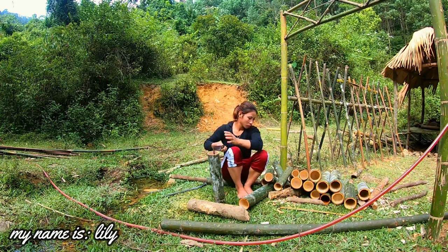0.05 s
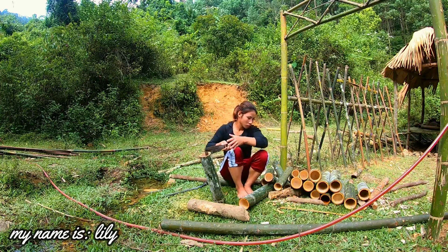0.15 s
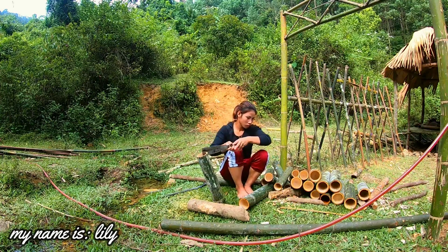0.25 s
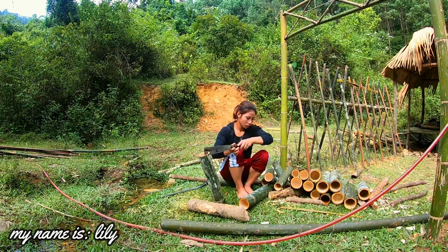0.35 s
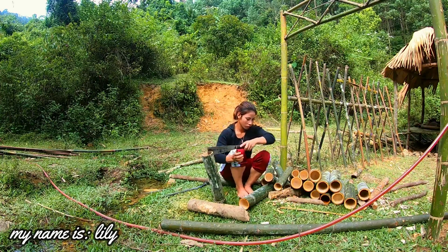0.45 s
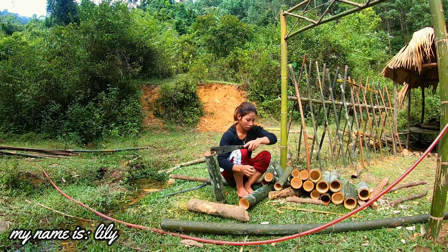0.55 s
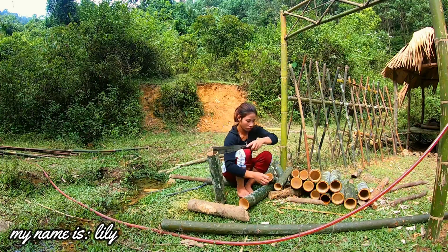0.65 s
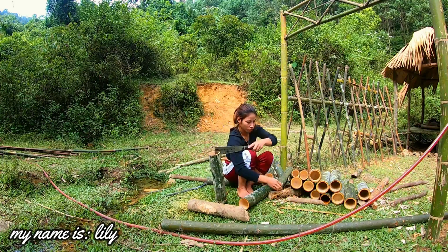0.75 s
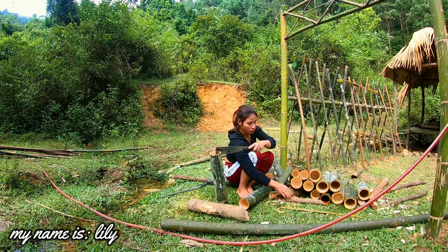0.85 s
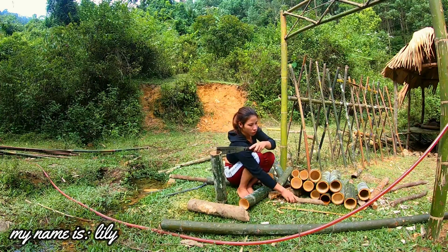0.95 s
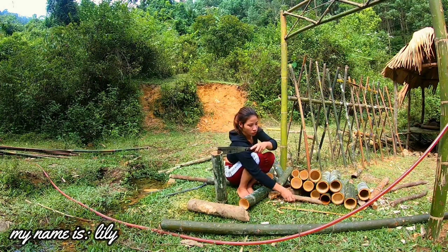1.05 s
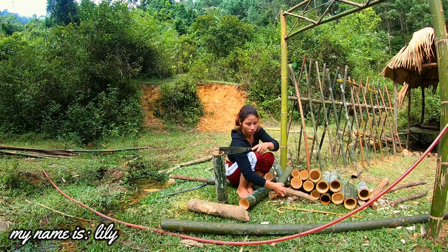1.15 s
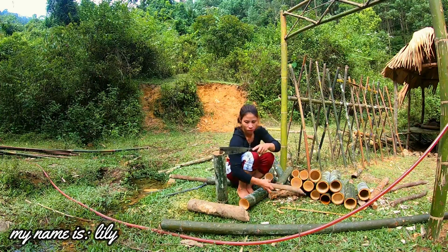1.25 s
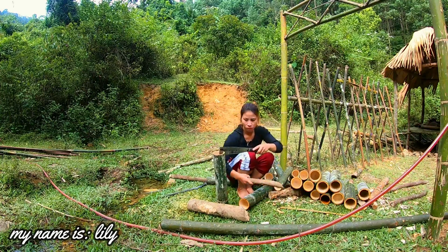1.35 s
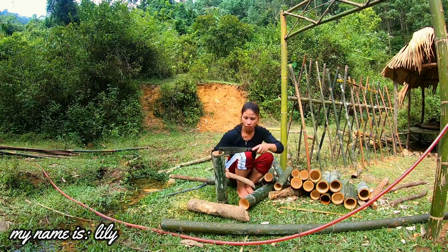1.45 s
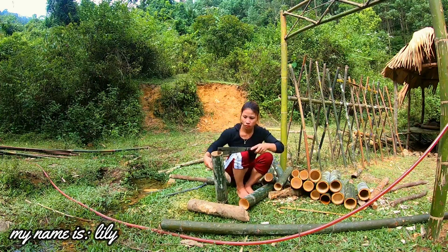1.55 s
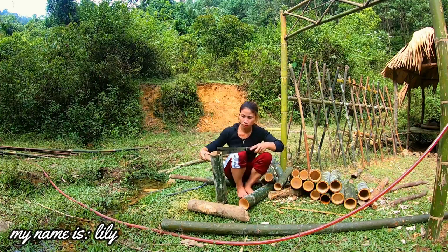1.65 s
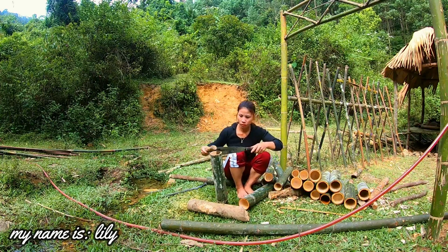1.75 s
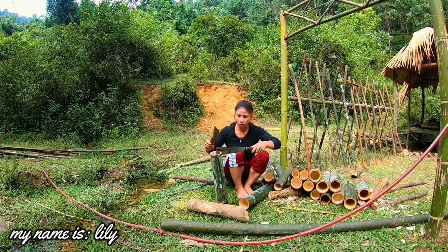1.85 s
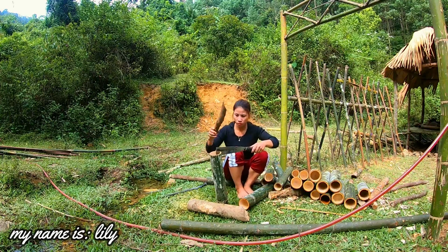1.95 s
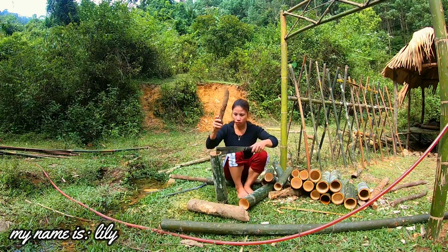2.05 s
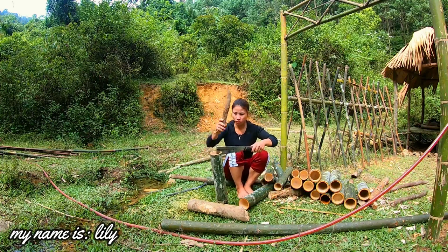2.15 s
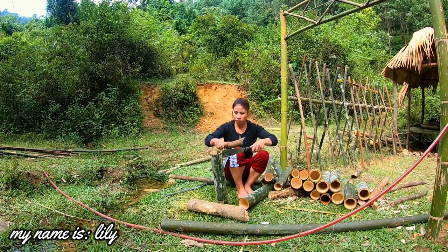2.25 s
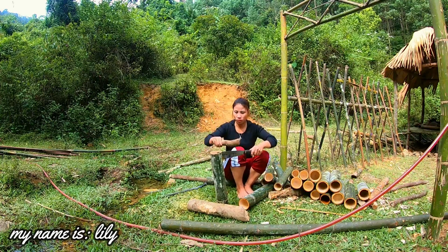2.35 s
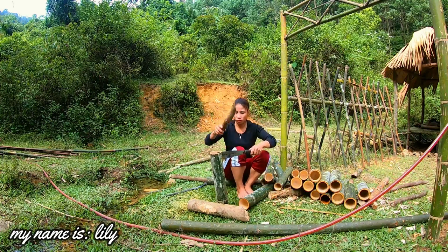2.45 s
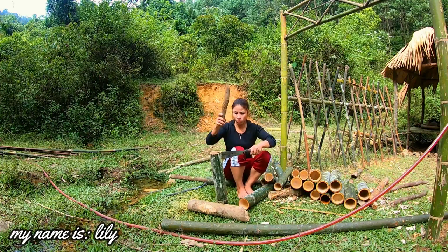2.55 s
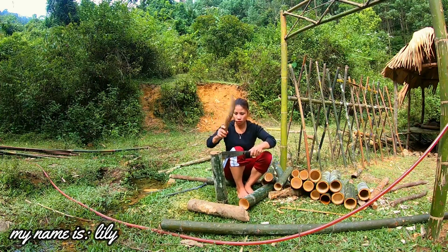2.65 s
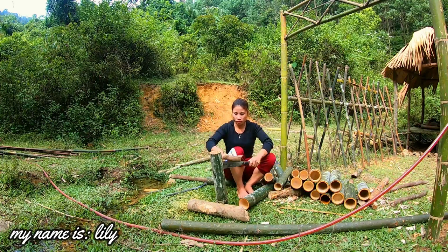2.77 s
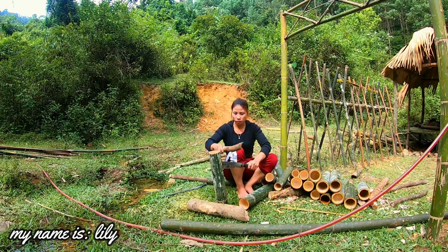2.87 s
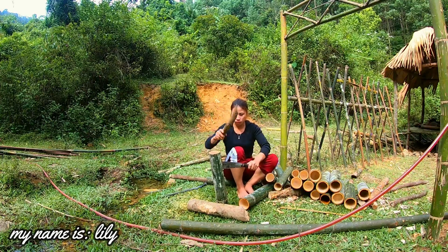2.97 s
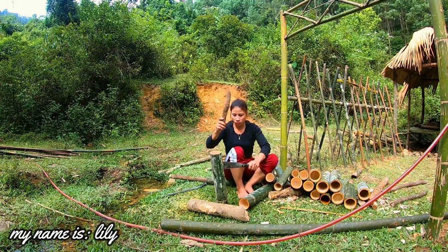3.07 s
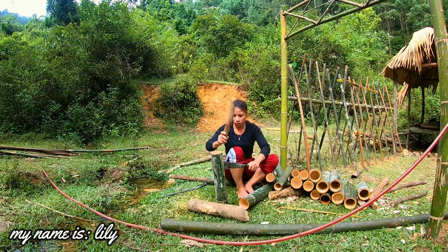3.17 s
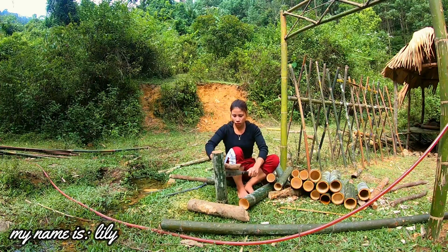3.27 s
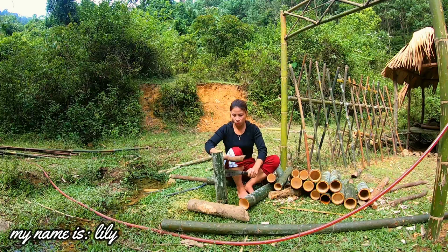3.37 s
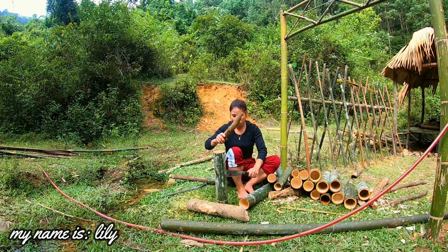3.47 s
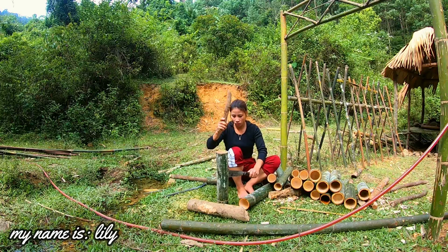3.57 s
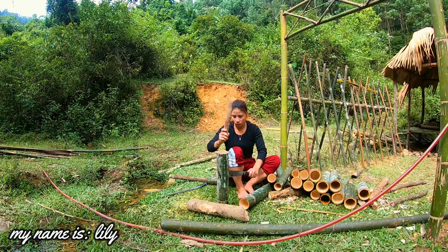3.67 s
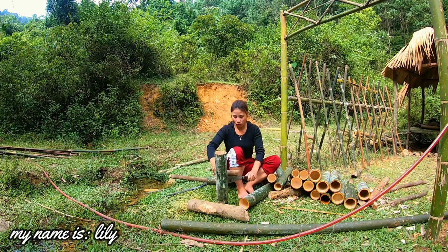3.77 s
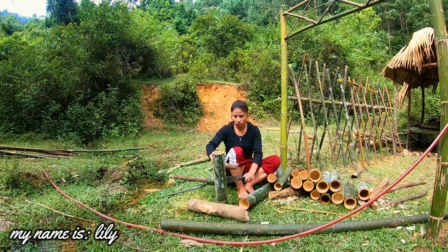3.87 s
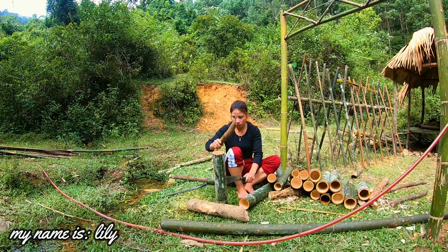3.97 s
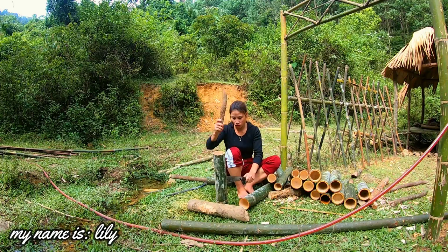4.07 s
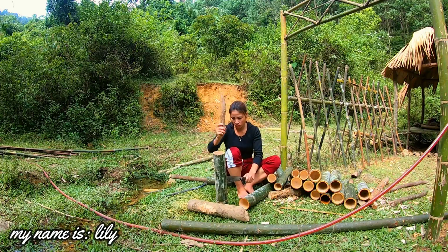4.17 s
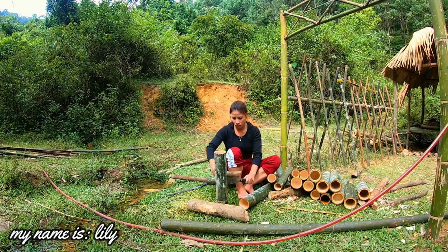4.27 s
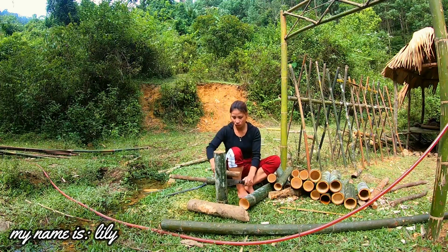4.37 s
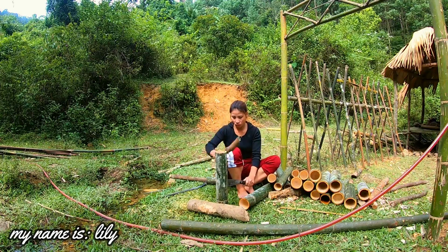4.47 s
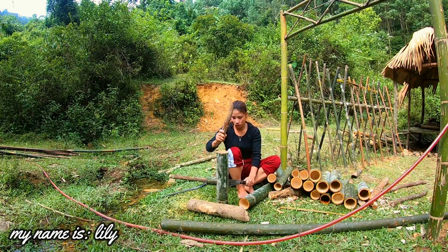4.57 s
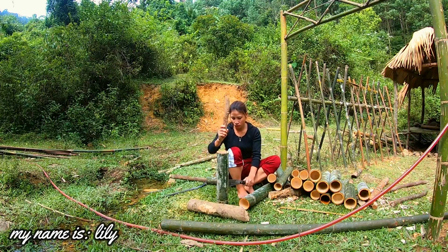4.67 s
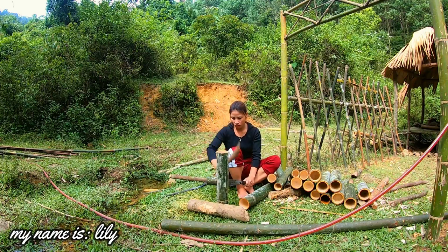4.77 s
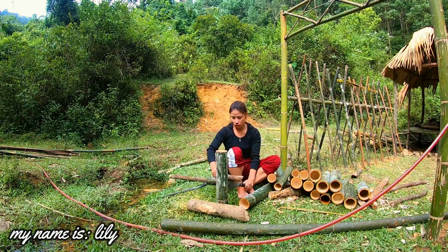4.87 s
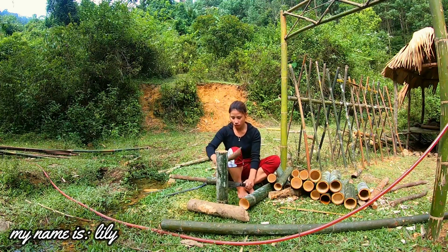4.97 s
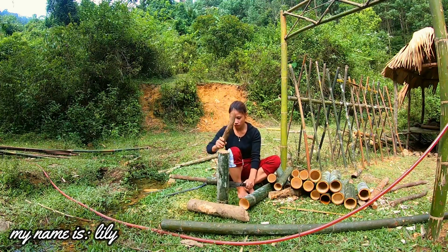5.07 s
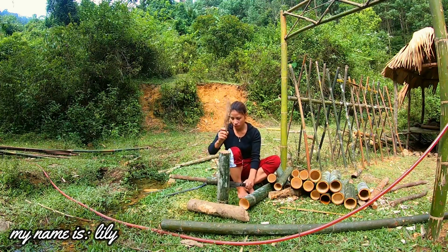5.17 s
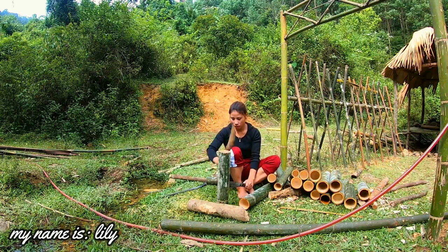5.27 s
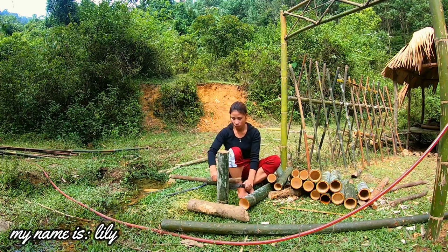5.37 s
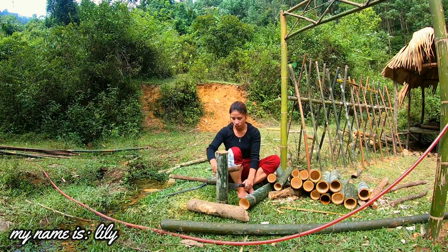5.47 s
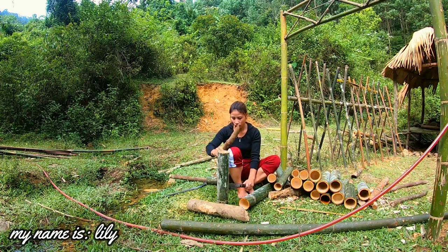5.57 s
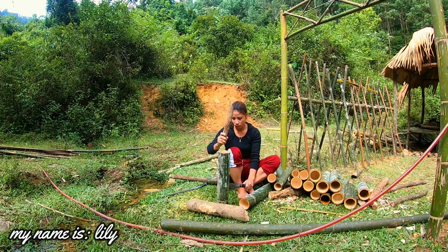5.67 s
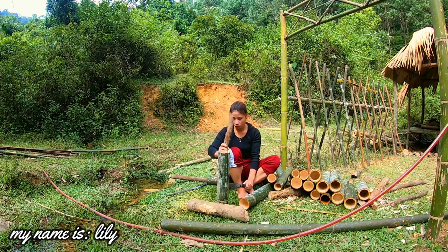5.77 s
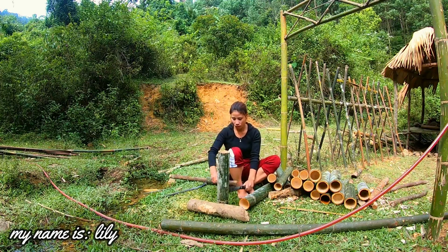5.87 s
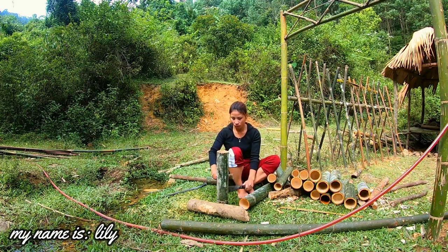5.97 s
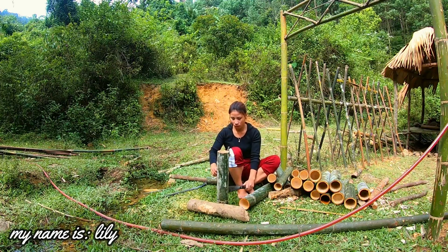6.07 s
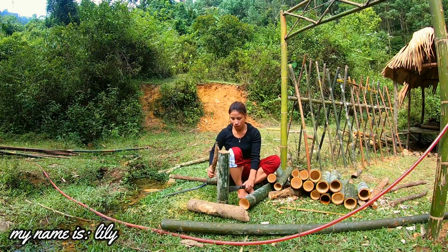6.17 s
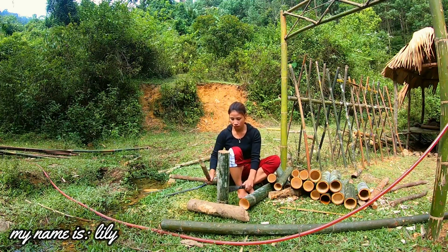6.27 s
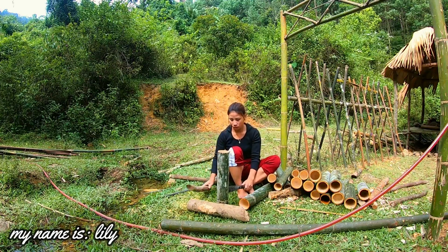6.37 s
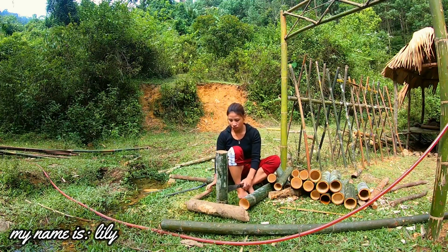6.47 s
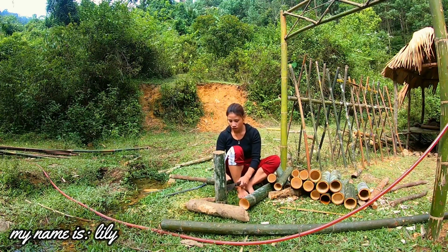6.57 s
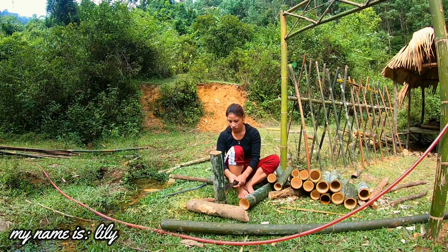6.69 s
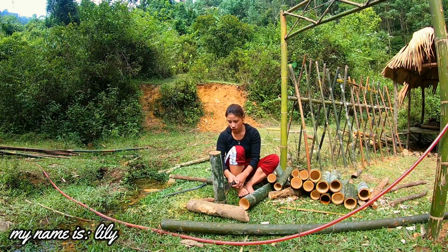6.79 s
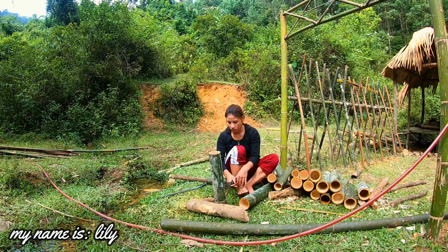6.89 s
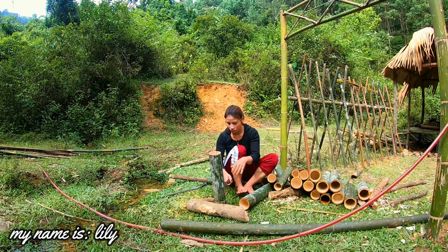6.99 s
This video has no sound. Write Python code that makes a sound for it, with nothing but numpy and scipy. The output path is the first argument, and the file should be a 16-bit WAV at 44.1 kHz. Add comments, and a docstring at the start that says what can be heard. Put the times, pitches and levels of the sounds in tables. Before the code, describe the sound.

Bamboo pieces tick and scrape, then hard hollow chops ring out every half second over trickling water and high insect trills outdoors.

```python
"""Splitting green bamboo outdoors

A wooden club drives a heavy knife through upright bamboo in eight blows, each with a rebound.
Decaying modes form knock and blade ring, noise the torn fibres; the hollow tone yields to ringing halves.
Pieces tick and scrape. A stream of rising bubbles, drops and shaped noise runs close by; a cricket (pulsed
tone) and a farther insect (pulsed narrow noise) call. A gain control ducks after loud sounds."""
import sys
import numpy as np
from scipy import signal
from scipy.fft import rfft, irfft, next_fast_len
from scipy.io import wavfile
from scipy.ndimage import uniform_filter1d

SR = 44100
rng = np.random.default_rng(int(sys.argv[2]) if len(sys.argv) > 2 else 0)


def transcribe(signal):
    """Save signal, clipped to [-1, 1], as a 16-bit WAV file at the path in sys.argv[1]."""
    frames = np.atleast_2d(signal).T
    limited = np.clip(frames, -1, 1)
    pcm = np.round(limited * 32767).astype(np.int16)
    wavfile.write(sys.argv[1], SR, pcm)


N = 310023
TIME_S = np.arange(N) / SR
AGE_S = TIME_S[:SR // 3]   # time since a contact

# phrases of the far, raspy insect: (start [s], end [s], level [dB])
RASP_PHRASES = [(0.85, 1.5, -53), (4.05, 4.5, -45), (4.96, 5.877, -48), (6.35, 7.2, -48.5)]
# phrases of the near cricket: (start [s], end [s], level before warm-up and tiring [dB])
CRICKET_PHRASES = [(-0.5, 0.08, -32.5), (0.57, 4.63, -31.5), (5.119, 7.2, -33)]
CRICKET_HZ, CRICKET_TIRES_DB_PER_S = 6420, 1.0
WARM_UP_S, WARM_UP_FLAT_HZ, WARM_UP_SOFT_DB = 0.16, 267, 4.5   # each phrase opens flat and soft

# even rush of the water: (frequency [Hz], relative density [dB per Hz])
RUSH_SPECTRUM = [(30, -17), (108, -23.5), (160, 4), (300, 2), (480, -4.5), (700, -0.5), (1000, -1.5),
                 (2000, 0), (2900, -4.5), (4000, -7.5), (5600, -6), (7300, -11.5), (9200, -8),
                 (11200, -35.5), (15500, -40)]
# left-right likeness of the rush: (frequency [Hz], correlation [-1..1])
RUSH_LIKENESS = [(60, 0.43), (140, 1), (300, 0.81), (640, 0.13), (1400, -0.13), (3000, 0.36), (7000, -0.28),
                 (15000, -0.57)]
# big and small bubbles: (frequency [Hz], relative level [dB])
GURGLE_SPECTRUM = [(150, -10), (190, 2.5), (250, -4.5), (320, 0), (420, -13.5), (600, -3.5), (800, -21.5)]
SPLASH_SPECTRUM = [(800, -6), (1200, 0.5), (1900, 1), (2800, 4), (4000, -18), (6000, 3), (8500, -15.5)]
# rough level curve of the low water sound, applied at reduced depth: (time [s], level [dB])
LOW_WATER_CURVE = [(0.0, -42.5), (1.02, -45), (1.76, -41), (2.29, -44.5), (2.53, -50.5), (2.82, -45.5),
                   (5.42, -43), (5.62, -52), (6.56, -41.5), (7.03, -53.5)]
GURGLE_DB, LOW_WATER_DEPTH = -40.5, 0.54   # mean level ahead of the low cut; depth of the curve
SPLASH_DB = -38.5   # reference for splash and rush
# single drops and gulps: (time [s], level [dB], starting pitch [Hz])
DROPS = [(1.144, -24, 1083), (1.55, -25.5, 1160), (1.736, -17, 270), (1.965, -18, 310), (4.782, -20, 1187),
         (5.334, -13, 303), (6.894, -27, 1120)]

# bamboo pieces knock each other and the ground: (time [s], level [dB], pitch [Hz])
TAPS = [(0.047, -20.5, 3250), (0.5595, -17, 1830), (0.562, -17, 327), (0.620, -22, 1700),
        (1.068, -22.5, 1910), (1.196, -22, 1980), (2.252, -23, 2740), (3.841, -20.5, 2370),
        (4.929, -13.5, 110), (6.557, -20, 110), (6.685, -15, 276), (6.687, -23, 2200)]
TAP_T60_AT_1KHZ_S, TAP_SHORTENING_POWER = 0.017, 0.63   # ring time falls with pitch
# scrapes of bamboo and fibres giving way: (time [s], length [s], level before the swell [dB], centre [Hz])
SCRAPES = [(0.036, 0.04, -41.5, 3700), (0.6, 0.055, -41, 5900), (1.225, 0.066, -37, 2570),
           (2.217, 0.1, -39.5, 2520), (4.46, .14, -44, 3380), (4.946, 0.16, -38, 3520),
           (5.503, 0.15, -38.5, 3170), (5.512, 0.11, -43, 8000), (6.676, 0.078, -43, 1770)]

# blows of the club: (time [s], knock [dB], wall pitch [Hz], favoured blade pitch [Hz], fibre crack [dB],
#   rebound delay [s], rebound re blow before the offsets below [dB], hollow tone [dB],
#   hollow pitch [Hz], split open [0..1])
BLOWS = [ (2.3787, -6.5, 1281, 3220, -9.5, 0.0225, -9.5, -7.5, 685, 0.06),
         (2.8407, -3.5, 1136, 2370, -7, 0.026, -5, -3.5, 716, 0.01),
         (3.3629, -2, 1102, 2100, -12, 0.022, -17, -10.5, 723, 0.34),
         (3.878, -3.5, 1127, 2340, -13.5, 0.023, -19, -2.5, 789, 0.43),
         (4.4042, -3, 1257, 3660, -11.5, 0.0052, -14, -5.5, 740, 0.36),
         (4.9255, -3, 1274, 3570, -7.5, 0.004, -13, -7.5, 700, 0.77),
         (5.445, -14, 1165, 3020, -11.5, 0.0072, -2.5, -7.5, 760, 0.93),
         (5.988, -4.5, 1180, 2730, -13.5, 0.021, -18, -6.5, 730, 0.94)]
# club and bamboo wall: (multiple of wall pitch, relative level [dB], t60 [s])
WOOD_MODES = [(.13, -12, 0.12), (.19, -4.5, 0.038), (.41, -6, 0.061), (.573, -8.5, 0.045),
              (.715, -19, 0.11), (.79, -7.5, 0.073), (.86, -4, 0.041), (1, 5.5, 0.038), (1.25, -5, 0.072),
              (1.37, -1, 0.02)]
# steel blade, damped by the cleft: (frequency before BLADE_SCALE [Hz], relative level [dB], t60 [s])
BLADE_MODES = [(1566, -22, 0.035), (1700, -2, 0.019), (1940, 2, 0.029), (2204, -2, 0.041),
               (2510, -3, 0.024), (2774, 3.5, 0.016), (2960, -6, 0.048), (3135, -6, 0.04),
               (3435, -5, 0.052), (3710, 3.5, 0.022), (4120, -1.5, 0.025), (5100, -30, .035),
               (6500, -11, 0.016), (7300, -3, 0.014)]
BLADE_SCALE = 0.93
# the blade rings louder as it sinks and the club moves to its free tip
BLADE_FIRST_DB, BLADE_GAIN_DB_PER_BLOW, BLADE_FULL_DB = -12.5, 3.5, 1.5
BLADE_KNOCK_SHARE = 0.17   # share of the knock's dB added to the blade
# tearing fibres: (frequency [Hz], relative density [dB per Hz])
CRACK_SPECTRUM = [(30, -4), (90, -5), (200, -13), (500, 10.5), (1100, 6), (2000, -4), (3600, -0.5),
                  (5000, -5.5), (8500, -10.5), (11000, -28), (16000, -62)]
# ring of the parting halves: (multiple of their pitch, relative level [dB])
HALVES_MODES = [(0.622, -15), (0.999, -1), (1.27, -8)]
# the halves ring higher as they come free, and mostly on the rebound
HALVES_HZ, HALVES_RISE_HZ, HALVES_EARLY_DB = 321.3, 72.6, -10
# the club falls back with a like knock each time, on a blade now gripped
REBOUND_KNOCK_DB, REBOUND_BLADE_DB, REBOUND_HOLLOW_DB = -13, -1, 7.5
CUTOFF_HZ = 16000


def from_db(db):
    """Decibels to gain."""
    return 10 ** (np.asarray(db) / 20)


def rms_one(x):
    """Scale to rms 1."""
    return x / np.sqrt(np.mean(x ** 2) + 1e-20)


def at_hz(points, hz):
    """Read a spectrum on a log-frequency axis."""
    points_hz, values = np.transpose(points)
    return np.interp(np.log(hz), np.log(points_hz), values)


def pan(left_minus_right_db):
    """Left and right gains for a level difference."""
    return from_db(np.array([[left_minus_right_db], [-left_minus_right_db]]) / 2)


def fade(t60_s):
    """Exponential decay of 60 dB in t60_s."""
    return 1000. ** (-AGE_S / t60_s)


def add(track, start_s, sound):
    """Mix a sound into a track."""
    start = round(start_s * SR)
    track[start:start + len(sound)] += sound[:N - start]


def drift(knots_per_s):
    """Random knots of spread 1 joined by straight lines."""
    count = int(knots_per_s * TIME_S[-1]) + 2
    return np.interp(TIME_S * knots_per_s, np.arange(count), rng.standard_normal(count))


def butter(x, hz, kind, order=2):
    """Causal low-, high- or band-pass."""
    return signal.sosfilt(signal.butter(order, hz, kind, fs=SR, output="sos"), x)


def coloured(spectrum, size):
    """Noise with the given spectrum, rms 1."""
    padded = next_fast_len(size)
    hz = np.fft.rfftfreq(padded, 1 / SR).clip(1)
    shaped = rfft(rng.standard_normal(padded)) * from_db(at_hz(spectrum, hz))
    return rms_one(irfft(shaped, padded)[:size])


def ping(hz, cycles, rise=0):
    """A resonance swells in about a cycle and falls 60 dB in so many cycles; pitch rises by 2 * rise."""
    turns = hz * AGE_S[:int(cycles / hz * SR)]
    phase = 2 * np.pi * turns * (1 + rise * turns / cycles)
    return np.sin(phase) * 1000. ** (-turns / cycles) * (1 - np.exp(-turns ** 2))


def phrase(start_s, end_s, edge_s):
    """Linear swell, hold and release between two times."""
    return np.clip((TIME_S - start_s) / edge_s, 0, 1) * np.clip((end_s - TIME_S) / edge_s, 0, 1)


def far_insect(pitch_hz=4820, width_hz=170, strokes_per_s=15, flutters_per_s=74, edge_s=0.17):
    """Narrow noise rasps in phrases, pulsed by slow strokes and a faster flutter."""
    level = sum(from_db(db) * phrase(start_s, end_s, edge_s) for start_s, end_s, db in RASP_PHRASES)
    band_hz = [pitch_hz - width_hz / 2, pitch_hz + width_hz / 2]
    tone = rms_one(butter(rng.standard_normal((2, N)), band_hz, "band"))
    strokes = 1 + 0.5 * np.sin(2 * np.pi * strokes_per_s * TIME_S)
    flutter = 1 + 0.39 * np.sin(2 * np.pi * flutters_per_s * TIME_S)
    return level * tone * rms_one(strokes * flutter) * pan(-3.5)


def cricket(period_s=0.04992, stroke_unit_s=0.019, droop_hz=330, echo_db=-8, echo_s=0.0157, edge_s=0.016):
    """Twenty wing strokes a second, each a pure tone that sags as the wing slows, with a short echo."""
    level, pitch_hz = np.zeros(N), np.full(N, float(CRICKET_HZ))
    for start_s, end_s, db in CRICKET_PHRASES:
        singing = phrase(start_s, end_s, edge_s)
        age_s = np.maximum(TIME_S - start_s, 0)
        cold = np.exp(-(age_s / WARM_UP_S) ** 4)
        level += singing * from_db(db - WARM_UP_SOFT_DB * cold - CRICKET_TIRES_DB_PER_S * age_s)
        pitch_hz -= (singing > 0) * WARM_UP_FLAT_HZ * cold
    since_s = (TIME_S - 1.5397) % period_s
    stroke = np.minimum(since_s / stroke_unit_s, 1.4)   # a stroke lasts 1.4 units
    swell = np.sin(np.pi * (stroke / stroke.max()) ** 1.14).clip(0) ** 2
    sag_hz = droop_hz * np.clip(2 * (stroke - 0.8), 0, 1) ** 2
    hz = pitch_hz - sag_hz + 18 * drift(90)
    tone = np.sin(2 * np.pi * np.cumsum(hz) / SR)
    song = level * from_db(0.35 * drift(28)) * swell * tone
    song = song + from_db(echo_db) * np.interp(TIME_S - echo_s, TIME_S, song)
    left = np.interp(np.arange(N) - 2, np.arange(N), song)   # sits right: left lags 2 samples
    return np.array([left, song]) * pan(-6.0)


def rush():
    """Countless tiny splashes merge into shaped noise, most alike on both sides in the bass."""
    size = next_fast_len(N)
    hz = np.fft.rfftfreq(size, 1 / SR).clip(1)
    mid, side = rfft(rng.standard_normal((2, size)))
    alike = at_hz(RUSH_LIKENESS, hz)
    both = np.sqrt(1 + alike) * mid + np.sqrt(1 - alike) * side * [[1], [-1]]
    return rms_one(irfft(both * from_db(at_hz(RUSH_SPECTRUM, hz)), size)[:, :N])


def bubbles(spectrum, per_s, cycles, spread_db, width_db, rise):
    """Bubbles born at random, each with its own pitch, strength and place, rise in pitch; stereo, rms 1."""
    out = np.zeros((2, N))
    lowest_hz, highest_hz = spectrum[0][0], spectrum[-1][0]
    for when, pitch, size, place in rng.random((int(per_s * TIME_S[-1]), 4)):
        hz = lowest_hz * (highest_hz / lowest_hz) ** pitch
        extra_db = spread_db * min(-np.log(1 - size), np.pi)
        gain = from_db(at_hz(spectrum, hz) + extra_db) * np.sqrt(hz)
        sound = gain * ping(hz, cycles, rise)
        for channel, side in zip(out, pan(width_db * (2 * place - 1))):
            add(channel, when * TIME_S[-1], side * sound)
    return rms_one(out)


def stream(rush_db=2.0, splash_share_db=-5.5, flutter_db=1.33, low_cut_hz=150):
    """Water falls into a small pool: big bubbles gurgle, small ones tinkle, a few drops stand out."""
    curve_db = np.interp(TIME_S, *np.transpose(LOW_WATER_CURVE))
    gurgle_db = GURGLE_DB + LOW_WATER_DEPTH * (curve_db - curve_db.mean())
    gurgle = from_db(gurgle_db) * bubbles(
        GURGLE_SPECTRUM, per_s=260, cycles=12.2, spread_db=2.5, width_db=5.0, rise=0.018)
    splash = from_db(splash_share_db) * bubbles(
        SPLASH_SPECTRUM, per_s=750, cycles=34.0, spread_db=3.5, width_db=15.0, rise=0.014)
    hiss = from_db(rush_db + flutter_db * drift(70)) * rush()
    drops = np.zeros(N)
    for s, db, hz in DROPS:
        add(drops, s, from_db(db) * ping(hz, cycles=0.044 * hz, rise=0.087))
    low = butter(gurgle + drops, low_cut_hz, "high", order=6)
    return low + from_db(SPLASH_DB) * (splash + hiss) * pan(-1.64)


def clearing(x, near_db=-10, near_t60_s=0.18, far_db=-25, far_t60_s=1.0, far_onset_s=0.095):
    """Ground and woodpile scatter the sound at once; the wooded slope answers faintly and later."""
    near_spectrum = [(100, -22), (600, -6.0), (1500, -8.0), (4000, -15.0), (12000, -2.5)]
    far_spectrum = [(100, -2), (700, -4), (1100, 12.5), (4000, 10.0), (9000, 2), (14000, -10)]
    near_onset = 1 - np.exp(-AGE_S / 0.00083)
    far_onset = 1 - np.exp(-(AGE_S / far_onset_s) ** 2)
    out = []
    for channel in range(2):
        near = coloured(near_spectrum, size=len(AGE_S)) * fade(near_t60_s) * near_onset
        far = coloured(far_spectrum, size=len(AGE_S)) * fade(far_t60_s) * far_onset
        echoes = from_db(near_db) * near / np.linalg.norm(near)
        echoes += from_db(far_db) * far / np.linalg.norm(far)
        out.append(signal.fftconvolve(x, echoes)[:N])
    return np.array(out)


def handling(grain_db=6.0, tick_db=-13, tick_t60_s=0.019):
    """Pieces of bamboo touch each other and the ground, and rub in grainy scrapes."""
    out = np.zeros(N)
    for s, db, hz in TAPS:
        t60_s = TAP_T60_AT_1KHZ_S * (hz / 1000) ** -TAP_SHORTENING_POWER
        tick = butter(rng.standard_normal(len(AGE_S)), [hz / 2, hz * 2], "band")
        add(out, s, from_db(db) * ping(hz, cycles=t60_s * hz))
        add(out, s, from_db(db + tick_db) * rms_one(tick) * fade(tick_t60_s))
    for s, length_s, db, hz in SCRAPES:
        hiss, grain = rng.standard_normal((2, len(AGE_S)))
        octave_hz = [hz / np.sqrt(2), hz * np.sqrt(2)]
        grains = from_db(grain_db * rms_one(uniform_filter1d(grain, size=60)))
        rub = butter(hiss, octave_hz, "band") * grains
        rub = rms_one(butter(rub, 9800, "low", order=12))
        swell = np.hanning(int(length_s * SR))
        add(out, s, from_db(db) * rub[:len(swell)] * swell)
    return out


def struck(modes, scale, aim_hz, focus_db, spread_db, detune):
    """Each contact meets a new spot and favours modes near one pitch; strengths and pitches vary."""
    hz, db, t60_s = np.transpose(modes)
    level, shift, sign = rng.standard_normal((3, len(hz)))
    hz = scale * hz * (1 + detune * shift)
    octaves_off = np.abs(np.log2(hz / aim_hz))
    gain = from_db(db + spread_db * level - focus_db * octaves_off) * np.sign(sign)
    waves = np.sin(2 * np.pi * hz[:, None] * AGE_S) * fade(t60_s[:, None])
    return gain @ waves / np.linalg.norm(gain)


def fibres(low_t60_s=0.094, high_t60_s=0.034, split_hz=3500, grain_db=2.5):
    """Fibres tear in a short uneven burst whose treble dies first."""
    snaps = from_db(grain_db * rms_one(uniform_filter1d(rng.standard_normal(len(AGE_S)), size=40)))
    burst = coloured(CRACK_SPECTRUM, size=len(AGE_S)) * snaps
    low = butter(burst, split_hz, "low") * fade(low_t60_s)
    high = butter(burst, split_hz, "high") * fade(high_t60_s)
    return low - high   # minus keeps the bands in phase at the split


def contact(knock_db, wall_hz, blade_db, blade_hz, crack_db,
            bite_s=0.00048, low_cut_hz=105, thud_hz=75, thud_db=-26):
    """The club meets the blade: wood and steel ring, fibres tear and the culm thuds into the soil."""
    knock = struck(WOOD_MODES, wall_hz, wall_hz, focus_db=0.94, spread_db=3.5, detune=0.0081)
    blade = struck(BLADE_MODES, BLADE_SCALE, blade_hz, focus_db=9.5, spread_db=2.2, detune=0.026)
    sound = from_db(knock_db) * knock + from_db(blade_db) * blade + from_db(crack_db) * fibres()
    sound *= 1 - np.exp(-AGE_S / bite_s)
    sound = butter(sound, low_cut_hz, "high")   # small bodies radiate little bass
    add(sound, 0, from_db(knock_db + thud_db) * ping(thud_hz, cycles=6.2))
    return sound


def rung_twice(hz, cycles, first_db, gap_s, second_db):
    """A resonance is set ringing, and a moment later pushed again in step with its swing."""
    out = np.zeros(len(AGE_S))
    add(out, 0, from_db(first_db) * ping(hz, cycles))
    whole_cycles_s = np.round(gap_s * hz) / hz
    add(out, whole_cycles_s, from_db(second_db) * ping(hz, cycles))
    return out


def chopping(hollow_cycles=40, hollow_lag_s=0.00369, halves_cycles=36):
    """Blow and rebound; as the split opens, the closed culm's tone yields to the lower ring of its halves."""
    out = np.zeros(N)
    for k, blow in enumerate(BLOWS):
        s, knock_db, wall_hz, blade_hz, crack_db, rebound_s, rebound_db, hollow_db, hollow_hz, split = blow
        blade_db = min(BLADE_FIRST_DB + BLADE_GAIN_DB_PER_BLOW * k, BLADE_FULL_DB)
        blade_db += BLADE_KNOCK_SHARE * knock_db
        add(out, s, contact(knock_db, wall_hz, blade_db, blade_hz, crack_db))
        gripped_db = blade_db + rebound_db + REBOUND_BLADE_DB
        rebound = contact(REBOUND_KNOCK_DB, wall_hz, gripped_db, blade_hz, crack_db + rebound_db)
        add(out, s + rebound_s, rebound)
        second_db = hollow_db + rebound_db + REBOUND_HOLLOW_DB
        closed = rung_twice(hollow_hz, hollow_cycles, hollow_db, rebound_s, second_db)
        add(out, s + hollow_lag_s, (1 - split) * closed)
        halves_hz = HALVES_HZ + HALVES_RISE_HZ * split ** 3
        for multiple, db in HALVES_MODES:
            ring = rung_twice(multiple * halves_hz, halves_cycles, db + HALVES_EARLY_DB, rebound_s, db)
            add(out, s, split * from_db(hollow_db) * ring)
    return out


def scene():
    """Mix the work, its echoes, the stream and the insects."""
    work = chopping() + handling()
    bass = butter(work, 700, "low", order=1)
    direct = bass + (work - bass) * pan(-3.5)   # only the treble is shaded on the left
    return direct + clearing(work) + stream() + cricket() + far_insect()


def gain_control(x, threshold_db=-24, slope=0.5, release_db_per_s=8.0, attack_s=0.097):
    """Level above the threshold pulls the gain down with a short lag; it then creeps back steadily."""
    # mean power of the last 30 ms
    power = uniform_filter1d(np.mean(x ** 2, axis=0), size=1323, origin=661)
    level_db = 10 * np.log10(power.clip(1e-12))
    over_db = slope * np.maximum(level_db - threshold_db, 0)
    released_db = release_db_per_s * TIME_S
    held_db = np.maximum.accumulate(over_db + released_db) - released_db
    pole = np.exp(-1 / (attack_s * SR))
    return x * from_db(-signal.lfilter([1 - pole], [1, -pole], held_db))


def record(dry):
    """Gain control, rounded peaks, and the top cut off."""
    x = gain_control(dry)
    rounded = x / (1 + x ** 6) ** (1 / 6)
    return signal.sosfilt(signal.ellip(10, 0.1, 70, CUTOFF_HZ, fs=SR, output="sos"), rounded)


dry = scene()
out = record(dry)
transcribe(out)
```